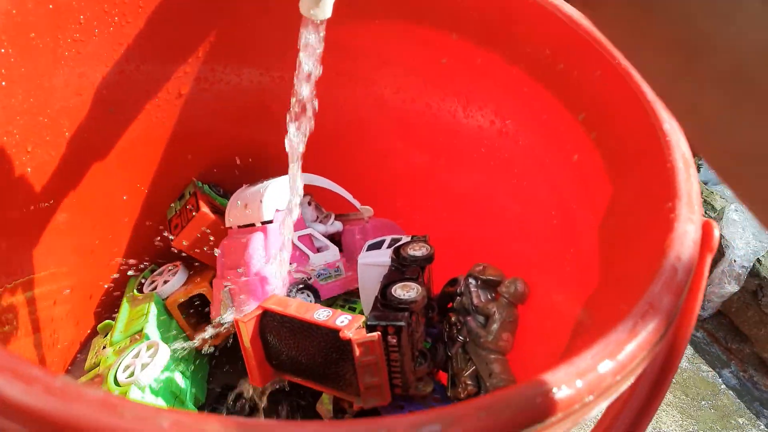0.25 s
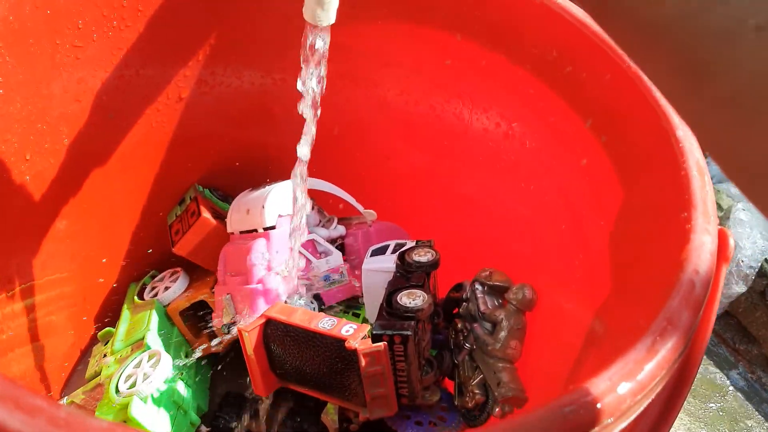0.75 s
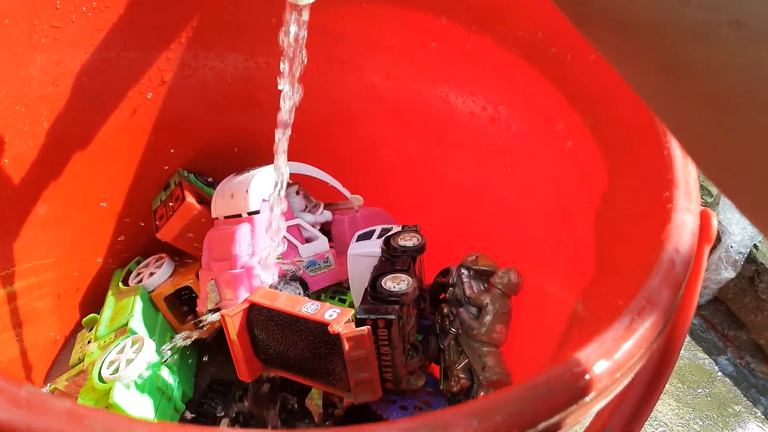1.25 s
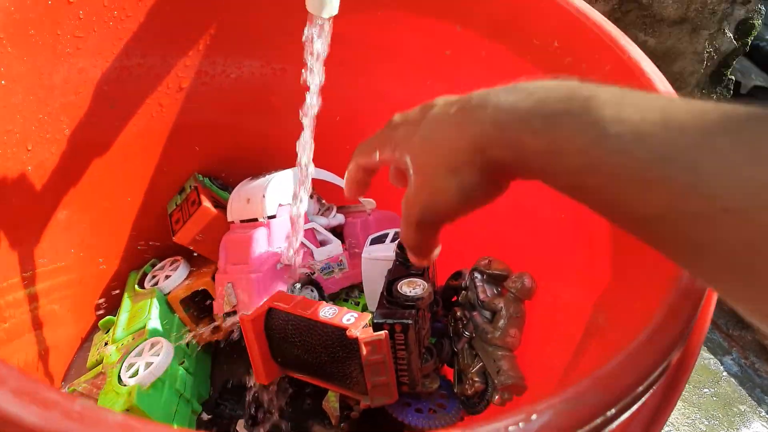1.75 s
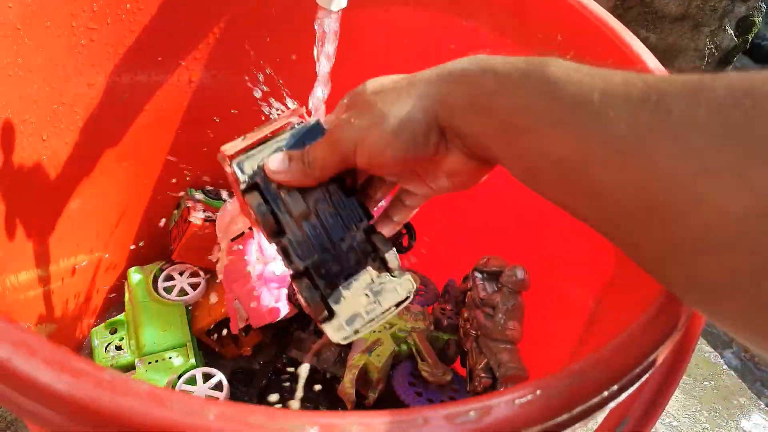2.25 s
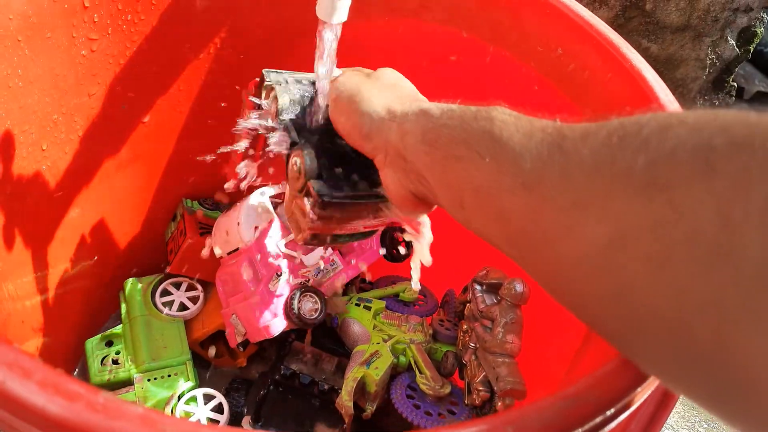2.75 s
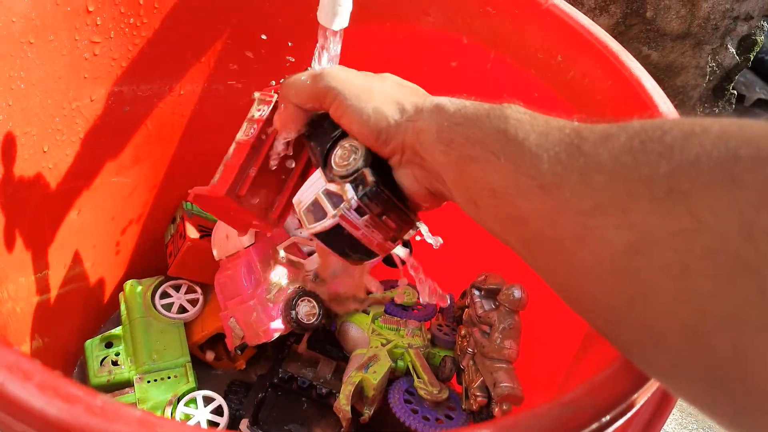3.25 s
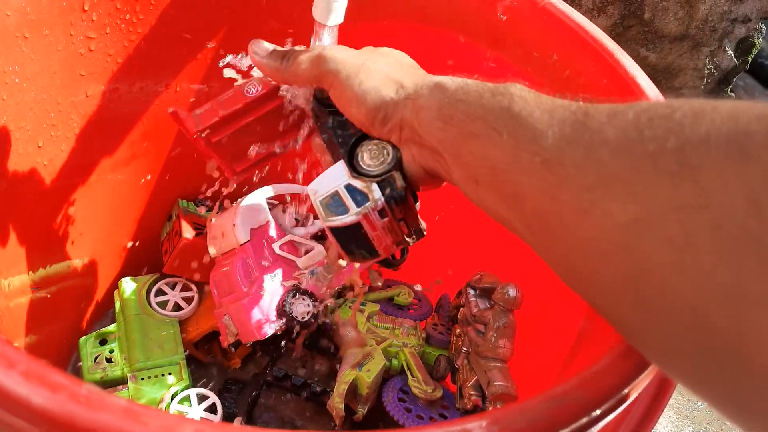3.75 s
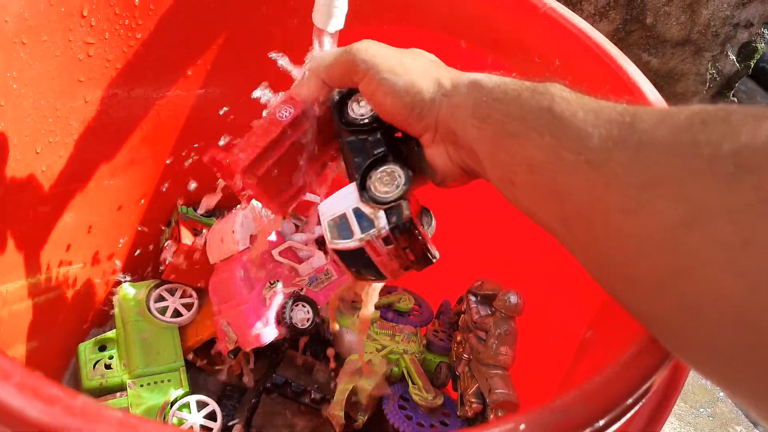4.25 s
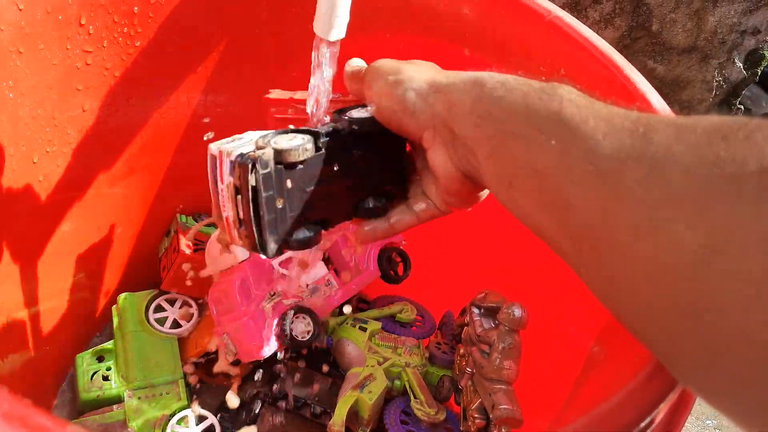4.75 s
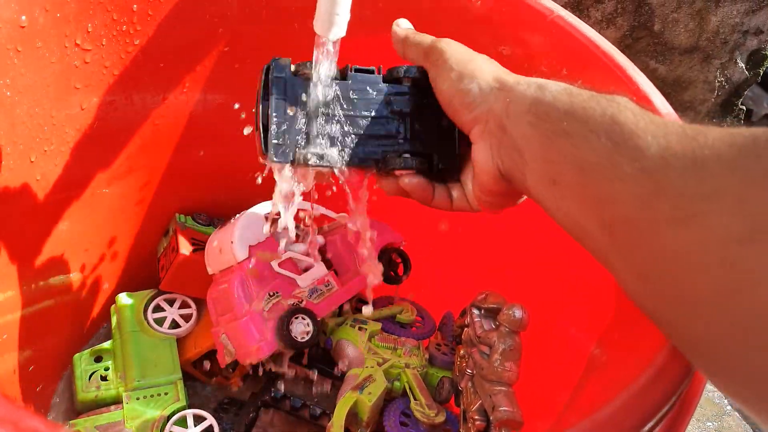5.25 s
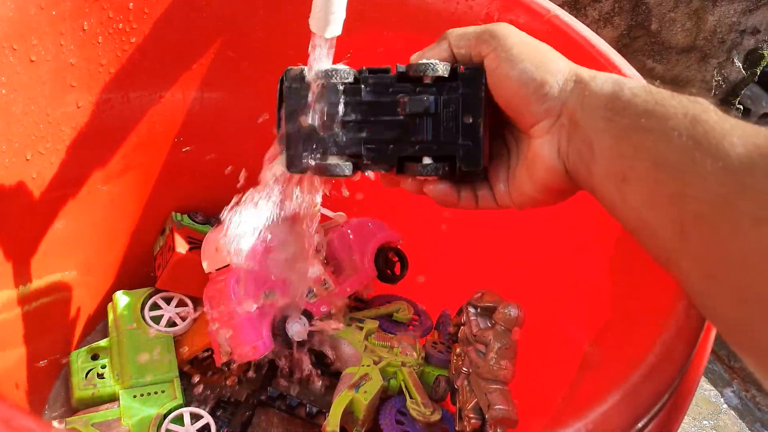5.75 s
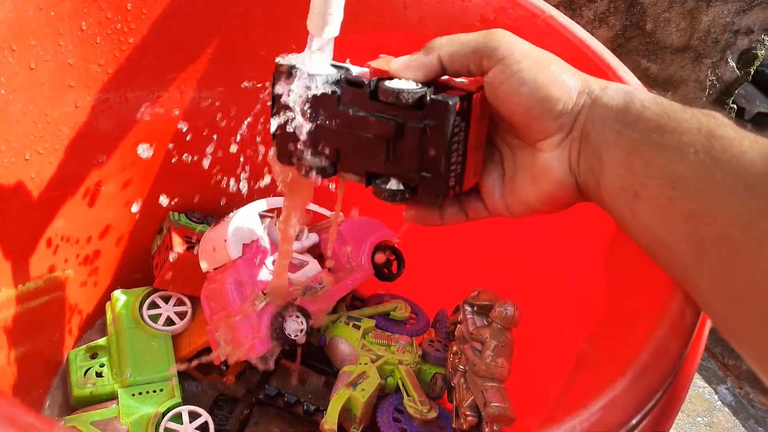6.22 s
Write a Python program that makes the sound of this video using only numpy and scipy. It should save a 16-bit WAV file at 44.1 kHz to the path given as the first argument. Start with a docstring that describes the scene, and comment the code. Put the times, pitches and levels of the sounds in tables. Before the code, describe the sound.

Outdoors, a steady bright stream of water spatters over hard plastic toys in a tub, with bubbles, small knocks and one sharp clack.

```python
"""Tap water on plastic toys in a bucket

Tap water falls on hard plastic toys in a large bucket, close to two microphone ports. Coloured noise makes
the spray, the run-off and its short splats; gliding sines are bubbles, and swept narrow noise whistles.
Struck modes make the toys knock; random slips ring the wall as one toy is dragged out of the heap.
A low rumble of outdoor air lies underneath."""
import sys
import numpy as np
from scipy import signal
from scipy.fft import rfft, irfft, next_fast_len
from scipy.io import wavfile
from scipy.ndimage import uniform_filter1d

SR = 44100
rng = np.random.default_rng(int(sys.argv[2]) if len(sys.argv) > 2 else 0)


def master_out(mix):
    """Clip the mix to full scale and print it as 16-bit PCM to the path in sys.argv[1]."""
    frames = np.transpose(np.atleast_2d(mix))
    ceiling = np.clip(frames, -1, 1)
    pcm = np.round(ceiling * 32767).astype(np.int16)
    wavfile.write(sys.argv[1], SR, pcm)


def volts_from_decibels(level):
    """Turn decibel levels (scalar or array-like) into linear amplitude factors."""
    exponent = np.asarray(level, float) / 20
    return 10 ** exponent


N = 285768

# colour of the water spray: f/Hz, relative density/dB per Hz
SPRAY_COLOUR = [(880, -16.5), (1500, -7.5), (1650, -18), (2170, -5.5), (2710, -9), (3330, -5.5),
                (6140, -5.5), (7600, -2.5), (8380, -5), (9410, -18.5), (12200, -8.5), (15300, -13)]
# modes of bucket and toys before wet damping: f/Hz, relative level/dB, t60/s
PLASTIC_MODES = [(129.6, -22, 0.23), (228.7, -15, 0.18), (249, -9, 0.076), (348, -10.5, 0.096),
                 (411, -13.5, 0.069), (619, -1, 0.076), (748, -16.5, 0.13), (861, -1.5, 0.054),
                 (1035, 1, 0.057), (1224, 2, 0.027), (1410, 7.5, 0.017), (2200, 3.5, 0.03),
                 (2500, 15, 0.0083), (3650, -13, 0.015), (4700, -25, .02), (5130, -6, 0.023),
                 (6800, -14, 0.017)]


def evened(x):
    """Scales to an rms of one."""
    return x / np.sqrt(np.mean(abs(x) ** 2) + 1e-20)


def read(points, hz):
    """Reads a table on a log-frequency axis."""
    f, value = np.transpose(points)
    return np.interp(np.log(hz + 1), np.log(f + 1), value)


def sides(pan_db):
    """Left and right gains for a left-minus-right level."""
    return volts_from_decibels(np.array([pan_db, -pan_db]) / 2)


def add(mix, s, sound):
    """Mixes a sound in at a time in seconds."""
    part = mix[:, max(round(s * SR), 0):][:, :sound.shape[1]]
    part += sound[:, :part.shape[1]]


def pair(shape, hz):
    """Complex noise for two ports, alike in the bass and less so in the treble."""
    # likeness of the two ports: f/Hz, correlation [0..1]
    likeness = [(40, 1), (130, 0.84), (300, 0.99), (1000, 1), (2500, 0.076), (5000, 0.05), (15000, 0.13)]
    a, b, c, d = rng.standard_normal((4, *shape))
    same = np.clip(read(likeness, hz), 0, 1)
    left, other = a + 1j * b, c + 1j * d
    return np.array([left, same * left + np.sqrt(1 - same ** 2) * other])


def hiss(size, colour, level_db, patchy_db, flicker_db):
    """Random short-time spectra with coloured patches and a flicker shared by all bands."""
    hop, hz = size // 4, np.fft.rfftfreq(size, 1 / SR)
    t = np.arange(N // hop + 5) * hop / SR
    field = rng.standard_normal((len(t), len(hz) + 1))
    patches = uniform_filter1d(field[:, 1:], size=12, axis=0)  # smoothed over frames, then over bins
    patches = evened(uniform_filter1d(patches, size=6, axis=1))
    flicker = evened(uniform_filter1d(field[:, :1], size=7, axis=0))
    gain = colour(t[:, None], hz)
    gain = gain / np.linalg.norm(gain, axis=-1, keepdims=True)  # same colour power in every frame
    spectra = pair(patches.shape, hz) * gain * volts_from_decibels(patchy_db * patches + flicker_db * flicker)
    x = signal.istft(spectra.transpose(0, 2, 1), nperseg=size, noverlap=size - hop)[1][:, :N]
    return evened(x) * volts_from_decibels(level_db)


def drumming(x, low_hz, high_hz):
    """A continuous push keeps the plastic modes between two pitches ringing; the rms comes out at one."""
    chosen = [mode for mode in PLASTIC_MODES if low_hz < mode[0] < high_hz]
    hz, db, t60 = np.transpose(chosen)[:, :, None]
    t = np.arange(6000) / SR
    modes = (volts_from_decibels(db - 60 * t / (0.49 * t60)) * np.sin(2 * np.pi * hz * t)).sum(0)
    return evened(signal.fftconvolve(x, modes[None], axes=1)[:, :N])


def bucket(x):
    """The near wall throws treble back within some thirty milliseconds, differently to each port."""
    t = np.arange(1500) / SR
    sparse = rng.random((2, 1500)) < 0.06
    taps = rng.standard_normal((2, 1500)) * sparse * volts_from_decibels(-60 * t / 0.052) * (t > 0.0008)
    taps /= np.linalg.norm(taps, axis=1, keepdims=True)
    taps = signal.lfilter(*signal.butter(1, 900, "high", fs=SR), taps)
    return signal.fftconvolve(x, taps, axes=1)[:, :N]


def stream():
    """The force of the water and what it lands on set the levels of its layers over time."""
    # the stream: t/s, force of the spray/dB, run-off over the toys/dB
    flow = [(0.0, -35.5, -49.5), (0.31, -40.5, -48.5), (0.56, -38, -46.5), (0.72, -42.5, -51.5),
            (0.8, -43, -50), (0.87, -42, -46.5), (1.05, -42.5, -55.5), (1.24, -47.5, -54.5),
            (1.4, -45.5, -54), (1.54, -51.5, -55.5), (1.66, -42.5, -51.5), (1.801, -43, -61.5),
            (1.99, -42.5, -47), (2.13, -39, -37), (2.26, -44.5, -41.5), (2.36, -40, -56),
            (2.45, -45.5, -67), (2.78, -43, -51.5), (2.95, -46.5, -49.5), (3.28, -42, -56.5),
            (3.47, -46, -52), (3.61, -42, -51), (4.1, -46, -57), (4.33, -44, -51), (4.66, -42, -50),
            (4.96, -40.5, -50), (5.09, -45.5, -45.5), (5.23, -43, -57.5), (5.55, -48, -53),
            (5.76, -40, -56), (5.88, -47, -51.5), (6.06, -41.5, -54.5), (6.48, -47, -53)]
    # what the stream lands on: t/s, fine mist against the spray/dB, left-right of the water/dB
    landing = [(0.0, 4.5, 0), (0.31, -0.5, -1), (2.0, 1, -1.5), (2.4, -2, -3), (3.2, -5.5, -4),
               (3.6, -1, -3), (4.0, -4, -3), (4.9, -2, -2.5), (5.8, 0.5, -2.5), (6.1, -1.5, -2.5),
               (6.48, -3.5, -3.5)]
    now = np.arange(N) / SR
    s, force_db, flow_db = np.transpose(flow)
    moves, fine_db, balance_db = np.transpose(landing)
    spray_db, runoff_db = np.interp(now, s, force_db), np.interp(now, s, flow_db)
    mist_db = spray_db + np.interp(now, moves, fine_db)
    slosh_db = -46 + 0.54 * (spray_db + 43.5)  # follows the force only in part
    return spray_db, runoff_db, mist_db, slosh_db, np.interp(now, moves, balance_db)


def shaped(colour_db, hz, slosh_db, spray_db, mist_db):
    """Gains whose bands below 4.5 kHz, up to 9.2 kHz and above carry the given levels."""
    gain, band = volts_from_decibels(colour_db), np.digitize(hz, [4500, 9200])
    return sum(volts_from_decibels(db) * gain * (band == k) / np.linalg.norm(gain[band == k])
               for k, db in enumerate((slosh_db, spray_db, mist_db)))


def spray(spray_db, mist_db, slosh_db):
    """Falling water hisses as noise: slosh at the bottom, spray in the middle, mist on top."""
    now, layers = np.arange(N) / SR, (slosh_db, spray_db, mist_db)

    def colour(t, hz):
        return shaped(read(SPRAY_COLOUR, hz), hz, *(np.interp(t, now, db) for db in layers))

    total_db = 10 * np.log10(sum(volts_from_decibels(db) ** 2 for db in layers))
    return hiss(size=256, colour=colour, level_db=total_db, patchy_db=4.0, flicker_db=2.0)


def runoff(runoff_db):
    """Water running off the toys is lower noise that drums on the plastic and hums in the bucket wall."""
    # colour of the run-off: f/Hz, relative density/dB per Hz
    runoff_colour = [(200, -24.5), (400, -8.5), (700, -0.5), (1200, -11.5), (1700, 5), (2300, -6),
                     (4000, -46)]
    flow = hiss(size=512, colour=lambda t, hz: volts_from_decibels(read(runoff_colour, hz)), level_db=0,
                patchy_db=2.6, flicker_db=2.4)
    filling_db = -1.14 * np.arange(N) / SR  # the filling bucket damps its wall
    wall_db = -55 + 1.43 * (runoff_db + 51.5) + filling_db
    on_toys = evened(flow + volts_from_decibels(2.0) * drumming(flow, 500, 1600))
    return volts_from_decibels(runoff_db) * on_toys + volts_from_decibels(wall_db) * drumming(flow, 100, 450)


def splat(db, peak_hz, mist_db, fade_ms):
    """A bursting lump is noise round one pitch, thin below it, that swells for 2 ms and fades in a few."""
    t, hz = np.arange(1024) / SR, np.fft.rfftfreq(1024, 1 / SR)
    octaves = np.log2((hz + 1) / peak_hz)
    hump_db = 9.1 * np.exp(-(octaves / 0.27) ** 2)
    thin_db = 1.44 * np.minimum(octaves, 0)
    gain, high = volts_from_decibels(read(SPRAY_COLOUR, hz) + hump_db + thin_db), hz > 9200
    gain[high] *= volts_from_decibels(mist_db) * np.linalg.norm(gain[~high]) / np.linalg.norm(gain[high])
    shape = (1 - np.exp(-(t / 0.0015) ** 2)) * np.exp(-1000 * t / max(fade_ms, 0.5))
    pan = sides(3 * rng.standard_normal())[:, None]  # each lands at its own place
    return volts_from_decibels(db) * pan * evened(irfft(pair(hz.shape, hz) * gain)) * 0.38 * shape / shape.max()


def splats(spray_db, mist_db):
    """Lumps of water burst: many small ones ride on the spray, and larger ones stand out."""
    # large bursts: t/s, nominal peak/dB, loudest f/Hz, mist against the body/dB
    lumps = [(0.119, -16, 7700, -18), (0.1266, -22, 7600, -14), (0.1446, -16, 7600, -17),
             (.1498, -11.5, 7450, -5), (.174, -21, 7630, -12), (.1795, -17, 7820, -14),
             (.1904, -17, 5230, 4), (0.248, -16.5, 6160, -19), (.271, -21, 8610, 5), (.301, -10.5, 7500, 9),
             (0.3207, -15.5, 2960, -23), (0.46, -19, 6660, -13), (0.441, -23, 6800, -16),
             (.477, -22, 6490, -22), (.546, -21, 2760, -16), (.597, -17.5, 5500, -30),
             (0.6397, -17, 6450, -12), (.645, -14.5, 7640, 7), (.655, -23, 6540, -15),
             (0.7088, -11, 6000, -5), (.717, -18, 5810, -8), (0.7293, -15.5, 7300, 1),
             (.7364, -14, 6500, 0), (0.748, -16.5, 6500, -17), (.837, -18, 2900, -5), (0.859, -13, 3200, 0),
             (0.8666, -21.5, 3340, -15), (.881, -20, 7500, -14), (0.8994, -18.5, 7460, -2),
             (0.907, -23, 8300, -1), (.9829, -9.5, 6100, -3.5), (1.039, -19.5, 6990, -2),
             (1.0704, -17.5, 7360, 5), (1.14, -18, 7480, 15), (1.164, -23, 6800, -10),
             (1.2028, -18, 2480, 9), (1.3378, -19, 2680, 1), (1.366, -21.5, 3430, -7),
             (1.4022, -25, 7550, 11), (1.4094, -23, 6540, -11), (1.4576, -24.5, 3540, -5),
             (1.486, -18, 5740, -9), (1.5998, -24, 7470, 12), (1.6144, -16, 7240, 6),
             (1.654, -23, 3900, -24), (1.7036, -19.5, 8000, -5), (1.71, -24, 7600, -10),
             (1.723, -24, 7400, -8), (1.787, -21.5, 7880, -6), (1.7936, -16.5, 7270, -1),
             (1.804, -23, 3430, -10), (1.8262, -24, 3000, -6), (1.8595, -14, 7850, -5),
             (1.8775, -16.5, 5700, -13), (1.916, -19.5, 7310, -4), (2.148, -18.5, 2600, 0),
             (2.184, -17.5, 4900, -7), (2.2127, -10.5, 4440, -14), (2.2693, -19, 5600, -9),
             (2.3277, -22, 6170, -19), (2.3661, -20, 4300, -10), (2.4016, -19.5, 7200, -26),
             (2.6826, -22, 8100, -1), (2.996, -23.5, 3720, -14), (3.079, -18.5, 7730, -4),
             (3.063, -23.5, 5360, -3), (3.2108, -26, 3340, -17), (3.2871, -21.5, 4260, -24),
             (3.425, -18, 7860, -24), (3.4926, -23.5, 4300, -20), (3.949, -11, 5300, 0),
             (3.962, -16.5, 4080, -22), (4.066, -25.5, 3660, -16), (4.2747, -24, 7940, -26),
             (4.3168, -21, 6750, -15), (4.341, -21.5, 7950, -5), (4.3595, -21, 8000, -21),
             (4.5514, -21, 7240, -8), (4.6308, -19, 4100, -25), (4.767, -22, 3970, -13),
             (4.9342, -17.5, 7690, 6), (5.126, -9, 7200, -3), (5.156, -20, 6400, -20),
             (5.1677, -16.5, 7250, -22), (5.1885, -18.5, 4200, -6), (5.251, -25.5, 5360, -15),
             (5.332, -27, 3750, -15), (5.453, -22, 7300, -4), (5.652, -20, 6300, -20),
             (5.703, -17.5, 7300, 11), (5.7491, -14, 3540, -14), (5.931, -20, 2310, 28),
             (6.3575, -23, 3250, -23), (6.4558, -22, 7950, -7)]
    out = np.zeros((2, N))
    for at, u, v, w, big in rng.random((760, 5)) * [N / SR, 1, 1, 1, 1]:  # small bursts, a few larger
        i = int(at * SR)
        db = spray_db[i] + 9.5 - 3.5 * np.log(big + 0.028)
        mist = mist_db[i] - spray_db[i] - 4.5 + 11 * w
        add(out, at, splat(db, 2300 * 3.6 ** u, mist, 1.4 + 3 * v ** 2))
    for at, db, hz, mist in lumps:
        fade_ms = 3.54 + np.log2(7000 / hz)  # bigger, lower lumps fade more slowly
        add(out, at - 0.0018, splat(db, hz, mist, fade_ms))  # early, to leave room for the swell
    return out


def bubble(db, hz, t60, rise):
    """A pocket of air rings as a decaying sine that glides in pitch and is shaken by the stream."""
    t = np.arange(2048) / SR
    t60 = max(t60, 0.005)
    shake = 0.6 * evened(uniform_filter1d(rng.standard_normal(len(t)), size=110))  # radians
    tone = np.sin(2 * np.pi * hz * t * (1 + rise * t / t60) + shake)
    return volts_from_decibels(db - 60 * t / t60) * (1 - np.exp(-t / 0.00042)) * tone * np.ones((2, 1))


def slide(length_s, from_hz, to_hz, db):
    """Water noise in a hollow whose pitch slides as it fills or drains."""
    t = np.arange(0, length_s, 1 / SR)
    sweep_hz = from_hz * (to_hz / from_hz) ** (t / length_s)
    turn = np.exp(2j * np.pi * np.cumsum(sweep_hz) / SR)
    a, b = rng.standard_normal((2, SR // 5))[:, :len(t)]
    r = np.exp(-np.pi * 340 / SR)  # two equal poles keep the noise narrow
    x = (turn * signal.lfilter([1], [1, -2 * r, r * r], a + 1j * b)).real
    x *= volts_from_decibels(2.5 * evened(uniform_filter1d(b, size=80)))  # broken up by the splashing
    return volts_from_decibels(db) * evened(x) * signal.windows.tukey(len(t), 0.5) * np.ones((2, 1))


def trapped_air(slosh_db):
    """Air caught in the water: many small bubbles, some clear ones, and short sliding whistles."""
    # clear bubbles: t/s, level/dB, f/Hz, t60/s
    clear_bubbles = [(0.3284, -25, 2500, 0.029), (.575, -27.5, 2150, .03), (.837, -33.5, 2816, 0.099),
                     (1.1972, -30, 2210, 0.037), (1.2632, -38.5, 1520, 0.099), (1.2974, -34, 3210, .028),
                     (1.563, -30.5, 1590, .023), (1.6322, -28, 2550, 0.019), (1.6737, -25, 2700, 0.01),
                     (1.8366, -23, 2930, 0.011), (2.0674, -21.5, 1430, 0.029), (2.8686, -33.5, 3680, 0.067),
                     (2.9394, -31, 3730, 0.018), (3.21, -20.5, 3250, 0.017), (3.4064, -22, 2040, 0.018),
                     (3.8766, -31.5, 2230, 0.026), (3.9131, -29.5, 1964, 0.12), (4.3658, -34.5, 994, 0.067),
                     (4.4657, -32.5, 2190, 0.031), (4.5744, -30, 2200, .035), (4.6, -36.5, 2130, 0.054),
                     (5.9509, -26, 1860, 0.021), (5.9842, -19, 2620, 0.0084), (6.019, -30, 2560, .035),
                     (6.086, -30, 4380, .021)]
    # sliding whistles: t/s, length/s, from f/Hz, to f/Hz, level/dB
    whistles = [(1.275, 0.11, 4280, 2770, -49.5), (2.332, 0.099, 4700, 2500, -43.5),
                (3.577, 0.094, 4160, 2200, -40.5), (5.965, .04, 1787, 3120, -39),
                (6.218, 0.1, 4240, 2255, -44)]
    pips = np.zeros((2, N))
    for at, u, v, big in rng.random((400, 4)) * [N / SR, 1, 1, 1]:  # small bubbles ring high and short
        hz = 800 * 8.13 ** u
        db = slosh_db[int(at * SR)] - 6.0 - 2.4 * np.log(big + 0.03)
        add(pips, at, bubble(db, hz, 60 / hz, 0.214 * (v - 0.3)))  # most climb, some sink in pitch
    for at, *row in clear_bubbles:
        add(pips, at, bubble(*row, rise=0.039))
    for at, *row in whistles:
        add(pips, at, slide(*row))
    return pips + volts_from_decibels(2) * bucket(pips)


def water():
    """Spray and run-off with the bursts and bubbles that ride on them, panned by where the stream lands."""
    spray_db, runoff_db, mist_db, slosh_db, pan_db = stream()
    bed = spray(spray_db, mist_db, slosh_db) + runoff(runoff_db)
    return (bed + splats(spray_db, mist_db) + trapped_air(slosh_db)) * sides(pan_db)


def ring(near_hz, hardness_db, free):
    """One blow into the plastic: its spot favours nearby modes, hard contact wakes the upper ones."""
    hz, db, t60 = np.transpose(PLASTIC_MODES)[:, :, None]
    spot_db, detune, phase = rng.standard_normal((3, len(PLASTIC_MODES), 1))
    t = np.arange(6000) / SR
    near_db = 9 * np.exp(-(np.log(hz / near_hz) / 0.11) ** 2)
    start_db = db + near_db + hardness_db * np.log2(hz / 800) + 0.88 * spot_db
    level_db = start_db - 60 * t / (t60 * max(free, 0.2))
    x = (volts_from_decibels(level_db) * np.sin(2 * np.pi * hz * (1 + 0.032 * detune) * t + 0.58 * phase)).sum(0)
    band = signal.butter(1, [600, 3000], "band", fs=SR)
    grit = signal.lfilter(*band, rng.standard_normal(len(t)))
    grit *= np.exp(-t / 0.0063)  # the contact chatters briefly
    x = x / abs(x).max() + volts_from_decibels(-19 + hardness_db) * grit / abs(grit).max()
    x *= 1 - np.exp(-t / 0.0017)
    return x / abs(x).max()


def knocks():
    """Plastic hits plastic; wet modes ring shorter, and shorter still after a hard, gripped blow."""
    # blows: t/s, peak/dB, favoured f/Hz, hardness/dB per octave
    blows = [(.151, -26.5, 605, 1.5), (0.172, -26.5, 790, -0.5), (.477, -30, 930, -1.5),
             (.546, -22.5, 1100, 9), (.915, -32.5, 357, 2.5), (1.966, -31, 415, 1), (2.017, -22, 347, 6.5),
             (2.057, -20.5, 1410, 7), (2.084, -30, 250, -8), (2.105, -19.5, 925, 1.5),
             (2.116, -19, 1115, -1.5), (2.128, -16, 1420, -2.2), (2.146, -29, 347, -4),
             (2.212, -15, 231, 2.5), (2.607, -27, 194, -5), (2.633, -31.5, 1060, -6), (2.713, -20, 976, 3),
             (2.772, -40, 795, -1), (2.802, -25.5, 930, 0), (2.819, -30, 250, 0.5), (2.85, -28, 1500, 8),
             (2.921, -18, 598, 2), (2.953, -32, 603, -4), (3.026, -26, 955, 5.5), (3.284, -29.5, 647, 4.5),
             (3.533, -35, 1230, 4.5), (3.956, -27.5, 655, 4), (3.891, -33, 1250, 0), (4.103, -26, 820, 8.5),
             (5.034, -29, 1070, 3), (5.093, -31.5, 590, -4), (5.125, -8.5, 1250, 2.5),
             (5.181, -33.5, 595, -6.5), (5.4, -32.5, 865, 1.3), (5.452, -28, 1470, 11),
             (5.475, -36.5, 262, -14), (5.545, -26, 1190, 3.5)]
    out = np.zeros((2, N))
    for at, db, *blow in blows:
        free = 0.83 - 0.012 * (db + 32)  # share of each t60 left
        add(out, at, volts_from_decibels(db) * ring(*blow, free)[None])
    return out


def scrape():
    """One toy dragged over the others slips at random, and the slips make the bucket wall rumble."""
    # a toy pulled out of the heap: t/s, level/dB
    drag = [(1.93, -59), (2.054, -47), (2.228, -40.5), (2.31, -51), (2.41, -48.5), (2.5, -75)]
    s, drag_db = np.transpose(drag)
    slips = (rng.random(N) < 300 / SR) * rng.laplace(size=N)  # about 300 uneven slips a second
    level_db = np.interp(np.arange(N) / SR, s, drag_db, left=-120, right=-120)
    return drumming(np.gradient(slips)[None], 100, 450) * volts_from_decibels(level_db)


def toys():
    """Knocks and scrape together, louder on the right, with the treble thrown back by the wall."""
    dry_toys = (knocks() + scrape()) * sides(-3.5)[:, None]
    return dry_toys + volts_from_decibels(-3) * bucket(dry_toys)


def outdoor_air():
    """Outdoor air is a low noise rumble that starts on a dying gust."""
    # colour of the air: f/Hz, relative density/dB per Hz
    air_colour = [(15, -42), (25, -5), (39, -4.5), (59, -4.5), (113, -11.5), (160, -18.5), (210, -52),
                  (350, -120)]
    gust_db = 6 * np.exp(-np.arange(N) / SR / 0.67)
    return hiss(size=2048, colour=lambda t, hz: volts_from_decibels(read(air_colour, hz)), level_db=-61.5 + gust_db,
                patchy_db=2.0, flicker_db=-2.0)


def scene():
    """Water and toys in the bucket, over the low rumble of outdoor air."""
    return water() + toys() + outdoor_air()


def band_limit(x):
    """A steep low-pass at the top of the band."""
    return signal.sosfilt(signal.butter(12, 17020, fs=SR, output="sos"), x)


def record(dry):
    """The left port hears late, each port has its own colour, and bass and top are cut."""
    # colour of the ports: f/Hz, left-right/dB
    port_tilt = [(60, 3), (110, -0.5), (200, 7), (380, 5), (700, -2), (1290, 2), (2380, 0.5), (4400, 2.5),
                 (8120, 4.5), (15000, 5)]
    # phase lag of the left port: f/Hz, lag/rad
    left_lag = [(0, 0.73), (300, 0.27), (690, 1.41), (1380, 1.47), (2400, 2.2), (4000, 6.66), (17000, 21.5)]
    size = next_fast_len(N + 256)
    hz = np.fft.rfftfreq(size, 1 / SR)
    lag = np.interp(hz, *np.transpose(left_lag))
    ports = sides(read(port_tilt, hz)) * np.array([np.exp(-1j * lag), 0 * hz + 1])
    bass_cut = (hz / 50) ** 4 / np.sqrt(1 + (hz / 50) ** 8)
    top_cut = 1 / (1 + np.exp(np.minimum((hz - 15950) / 40, 50)))  # a steep edge
    mix = irfft(rfft(dry, size) * ports * bass_cut * top_cut, size)[:, :N]
    return band_limit(mix)


dry = scene()
out = record(dry)
master_out(out)
```